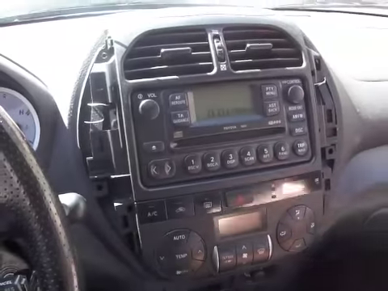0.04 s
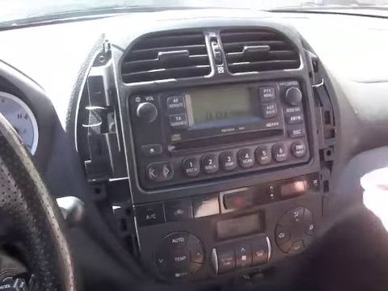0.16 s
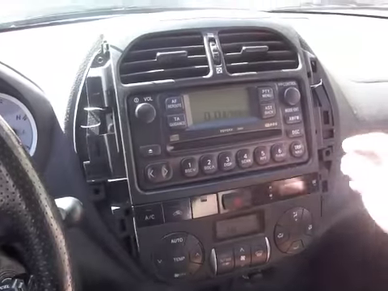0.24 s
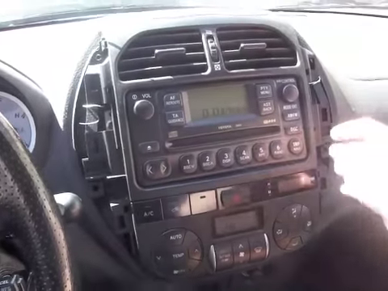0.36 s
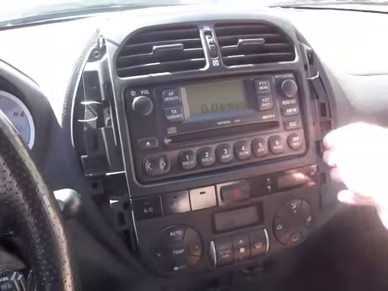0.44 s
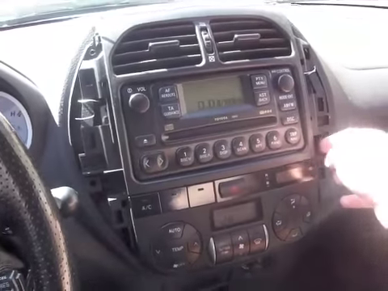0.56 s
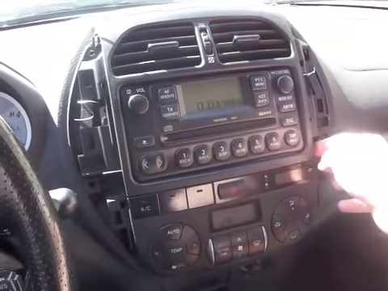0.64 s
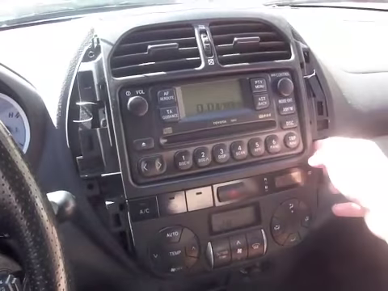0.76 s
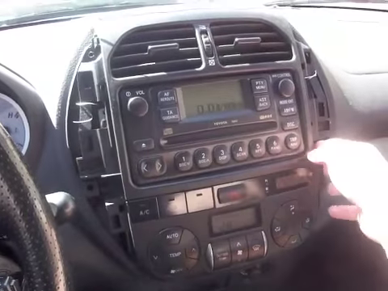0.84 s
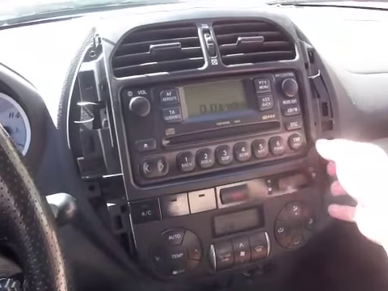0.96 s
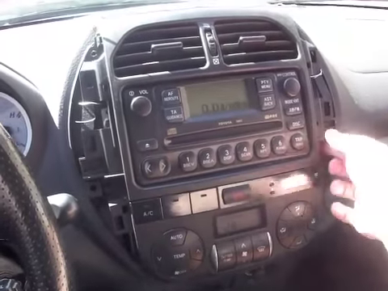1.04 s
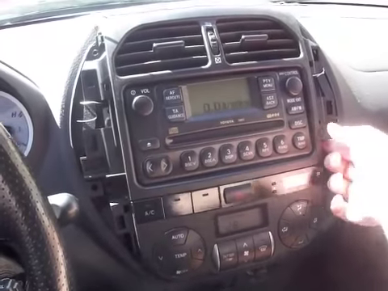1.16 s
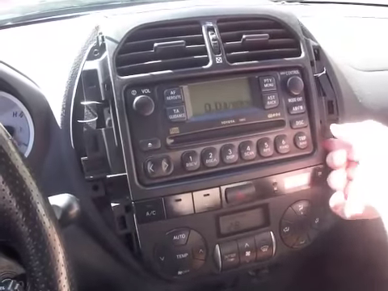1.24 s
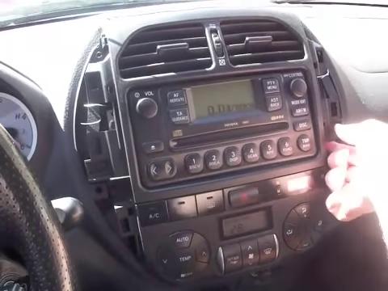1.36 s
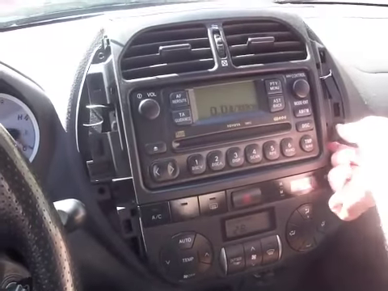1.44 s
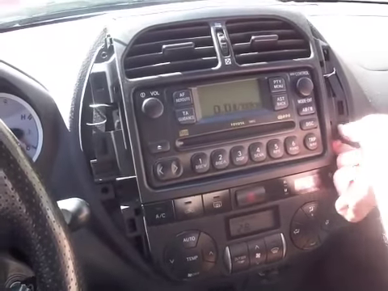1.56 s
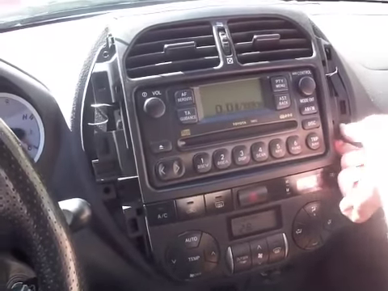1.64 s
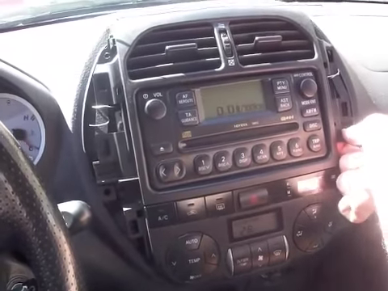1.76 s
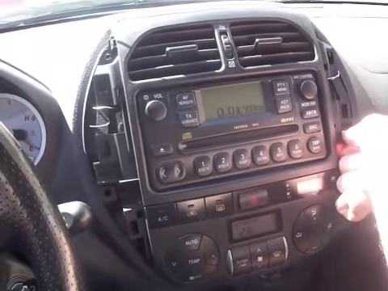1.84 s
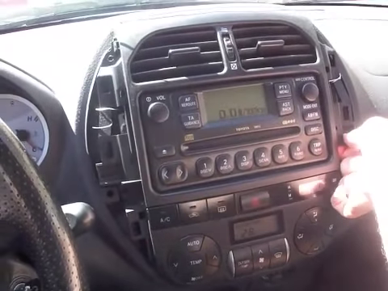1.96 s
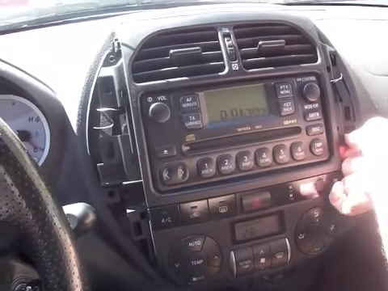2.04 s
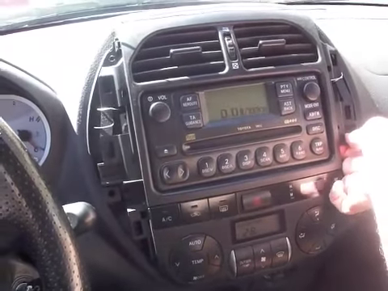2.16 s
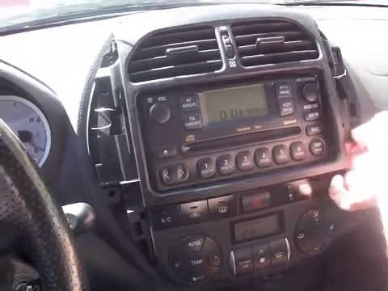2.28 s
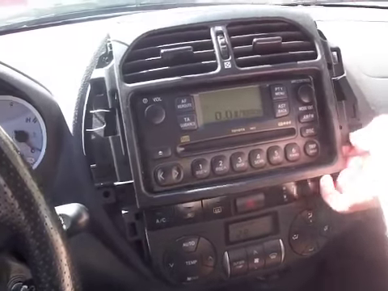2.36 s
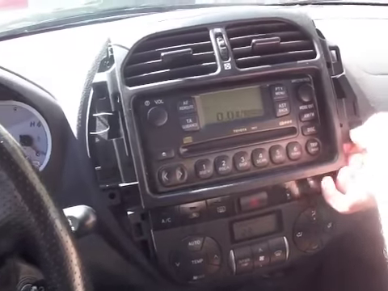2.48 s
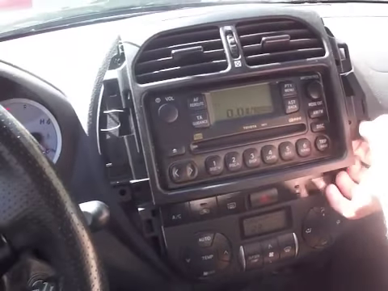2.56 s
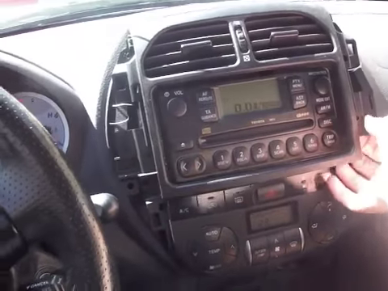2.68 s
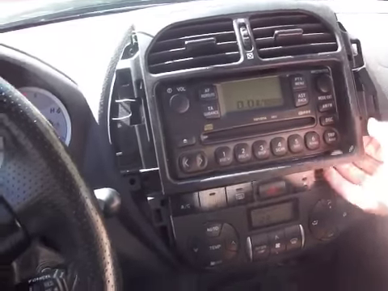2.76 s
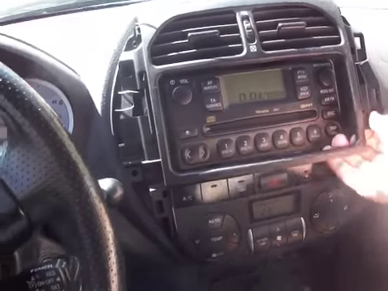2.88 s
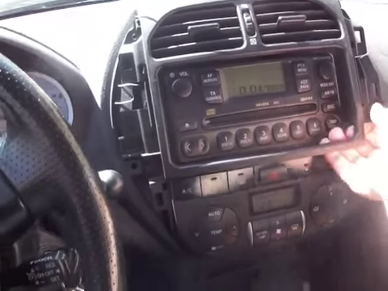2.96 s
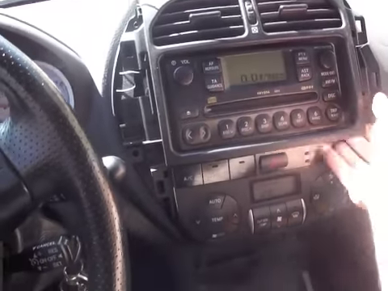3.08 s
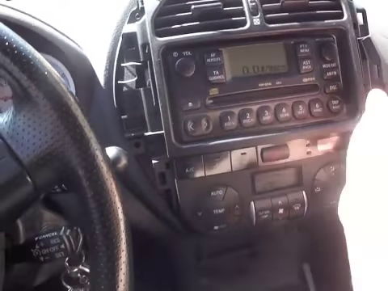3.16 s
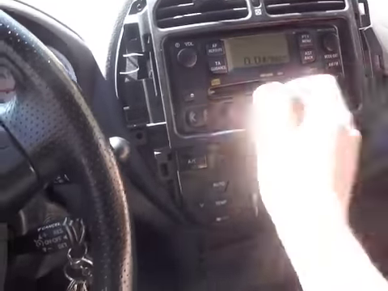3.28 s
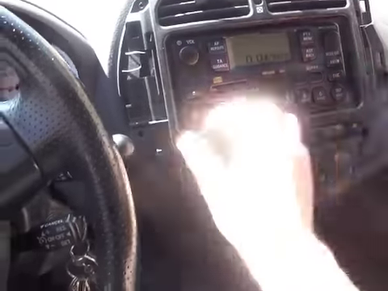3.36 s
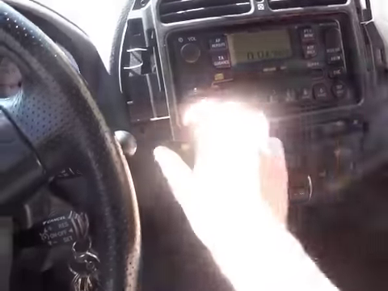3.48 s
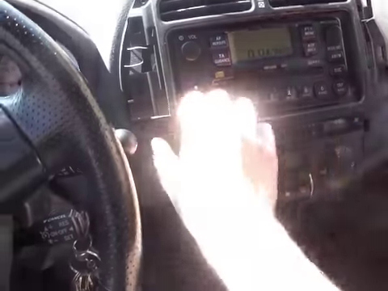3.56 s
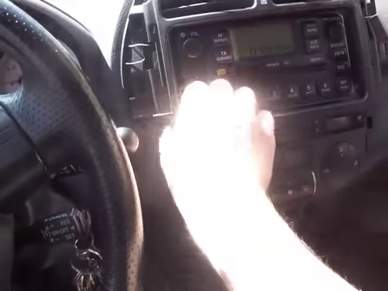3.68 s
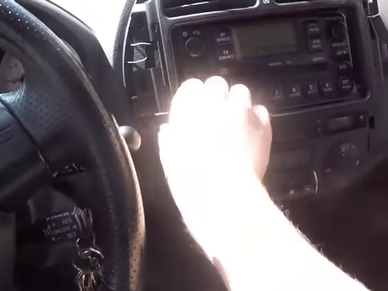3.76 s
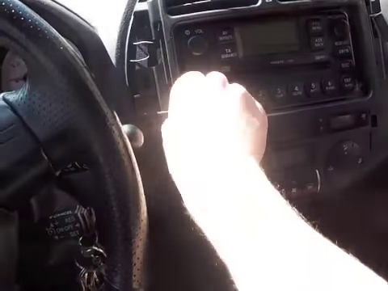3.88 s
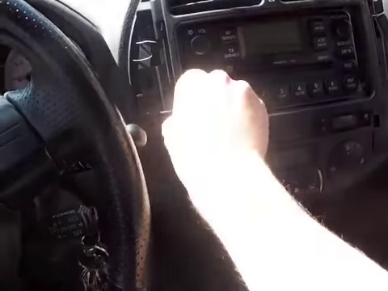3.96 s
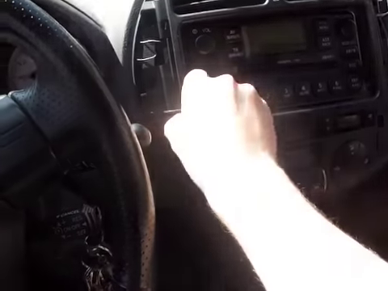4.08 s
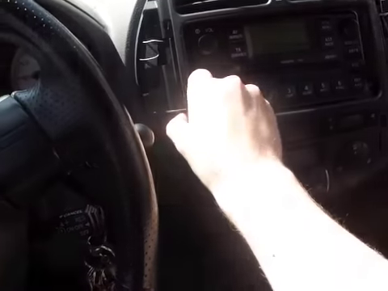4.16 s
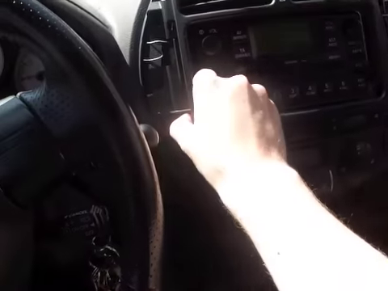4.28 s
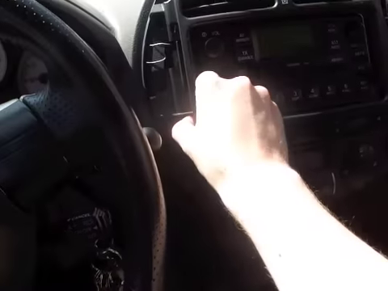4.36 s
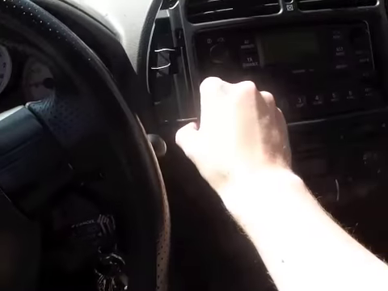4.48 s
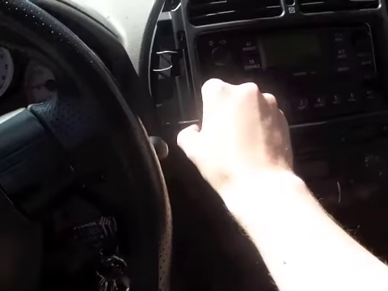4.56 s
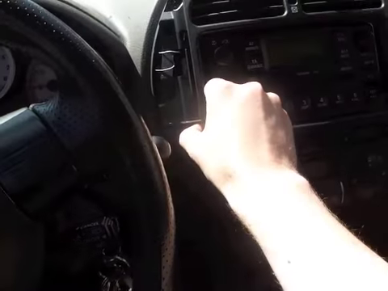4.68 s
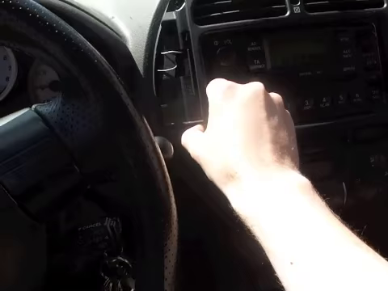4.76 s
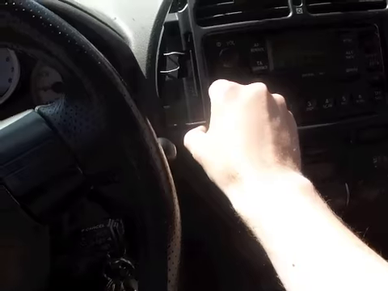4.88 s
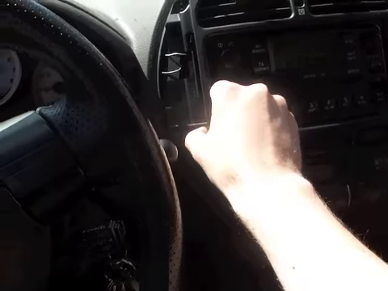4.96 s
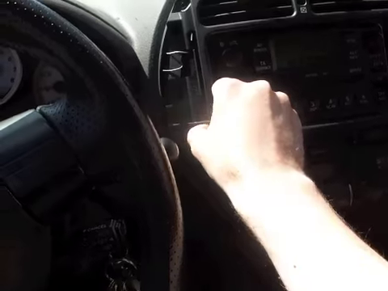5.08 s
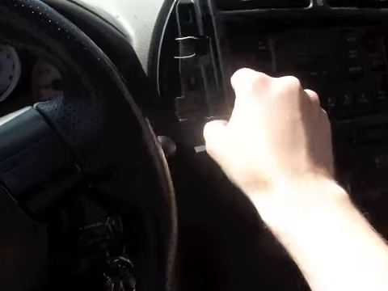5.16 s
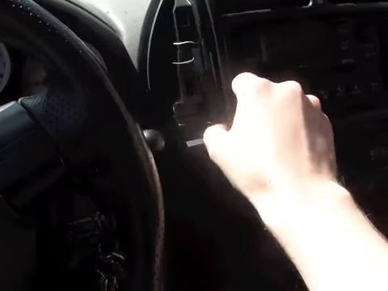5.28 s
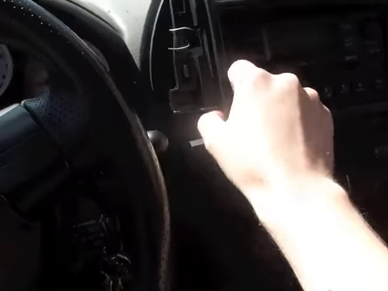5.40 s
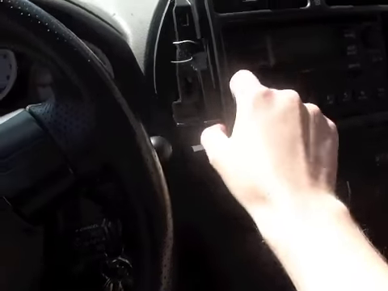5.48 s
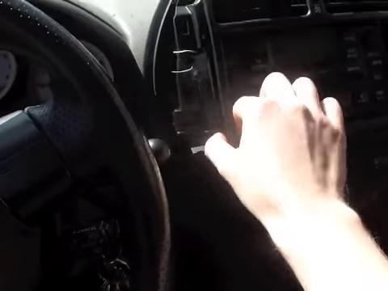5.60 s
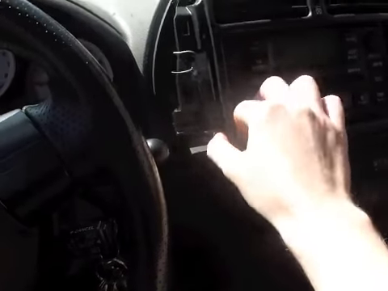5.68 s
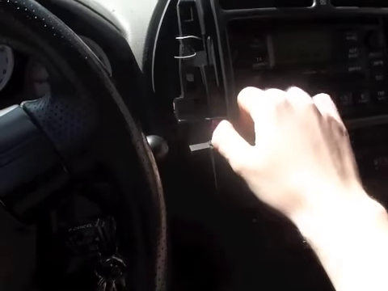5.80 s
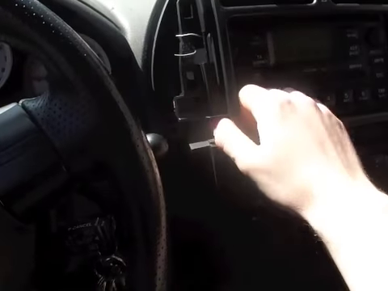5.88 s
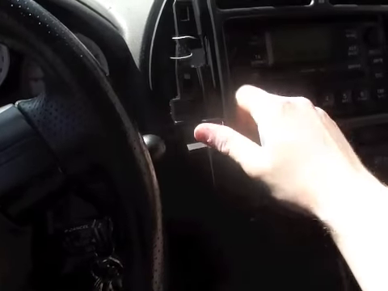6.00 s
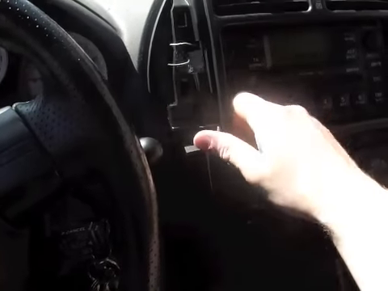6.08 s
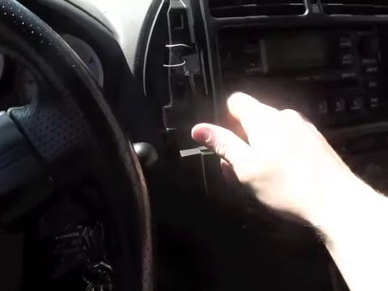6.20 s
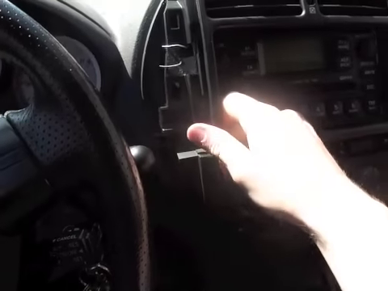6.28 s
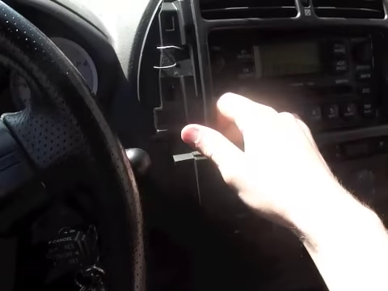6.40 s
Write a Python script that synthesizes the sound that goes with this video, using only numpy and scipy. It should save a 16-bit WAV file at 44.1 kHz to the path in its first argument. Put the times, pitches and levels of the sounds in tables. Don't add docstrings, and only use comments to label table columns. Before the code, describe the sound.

Close in a parked car, plastic clips click and knock under pulling fingers, tear free in two loud crackling bursts, and rattle afterward.

```python
import sys
import numpy as np
from scipy import signal
from scipy.fft import rfft, irfft, next_fast_len
from scipy.io import wavfile
from scipy.ndimage import uniform_filter1d

SR = 44100
rng = np.random.default_rng(int(sys.argv[2]) if len(sys.argv) > 2 else 0)


def wav_out(sig):
    wavfile.write(sys.argv[1], SR, np.round(np.clip(np.atleast_2d(sig).T, -1, 1) * 32767).astype(np.int16))


def voltage_ratio(decibels):
    exponent = np.asarray(decibels, float) / 20
    return 10 ** exponent


N = 284004

# frequency in Hz, level in dB.
FIZZ = [(3000, -14), (5000, -1.5), (7000, 0.5), (9000, 0), (12000, -0.5)]
# centre in Hz, width in Hz, depth in dB.
NOTCHES = [(3026, 290, -12.5), (3996, 303, -13), (5036, 320, -18)]


def evened(x):
    return x / np.sqrt(np.mean(x ** 2) + 1e-20)


def peaked(x, db):
    return voltage_ratio(db) * x / np.sqrt(uniform_filter1d(x.mean(0) ** 2, 130).max() + 1e-20)


def read(points, hz):
    f, value = np.transpose(points)
    return np.interp(np.log(hz + 1), np.log(f + 1), value)


def add(mix, s, sound, pan_db):
    part = mix[:, round(s * SR):][:, :sound.shape[-1]]
    sides = voltage_ratio(np.array([[pan_db / 2], [-pan_db / 2]]))
    part += (sound * sides)[:, :part.shape[1]]


def band(x, lo_hz, hi_hz, order=2):
    edges = [lo_hz, min(hi_hz, SR / 2 - 99)]
    return signal.sosfilt(signal.butter(order, edges, "band", fs=SR, output="sos"), x)


def resonate(x, hz, width):
    r = np.exp(-np.pi * width / SR)
    if np.ndim(hz) == 0:
        return 2 * signal.lfilter([1 - r], [1, -r * np.exp(2j * np.pi * hz / SR)], x).real
    turn = np.exp(2j * np.pi * np.cumsum(hz) / SR)
    return 2 * (turn * signal.lfilter([1 - r], [1, -r], x / turn)).real


def pair(noise, same):
    same = np.clip(same, -1, 1)
    return np.array([noise[0], same * noise[0] + np.sqrt(1 - same ** 2) * noise[1]])


def pressed_rub(t, hz):
    # time in s, level in dB.
    pressure = [
        (0.0, 10.5),
        (0.86, 2.5),
        (2.21, 5.5),
        (2.46, -6),
        (2.55, 10.5),
        (3.25, 2),
        (4.11, 1.5),
        (5.09, 1.5),
        (5.35, 4.5),
        (6.44, 3),
    ]
    # frequency in Hz, level in dB.
    air_colour = [(35, -14), (80, -25), (120, -9.5), (300, -0.5), (600, -3.5), (1200, -4), (2500, -13),
                  (4000, -17)]
    press_db = np.interp(t, *np.transpose(pressure))
    body = voltage_ratio(-50.5 + 0.32 * press_db - 2.5 + read(air_colour, hz)) * (hz < 5200)
    fizz = voltage_ratio(-63 + press_db - 12.0 + read(FIZZ, hz))
    return np.hypot(body, fizz)


def brushes(t, hz):
    # start in s, length in s, fizz in dB, body in dB.
    strokes = [(0.036, 0.65, -80, -81), (0.514, 0.092, -54.5, -58), (0.78, 0.038, -56, -81),
               (1.035, 0.1, -68, -52), (1.886, 0.043, -51, -87), (2.266, 0.15, -38, -34.5),
               (2.574, 0.11, -59, -47.5), (2.744, 0.19, -55.5, -47), (3.076, 0.094, -53.5, -56.5),
               (3.494, 0.069, -59, -54.5), (3.553, 0.09, -51.5, -52), (3.672, 0.078, -50.5, -54.5),
               (3.886, 0.036, -52, -56.5), (5.189, 0.049, -33.5, -31), (5.232, 0.092, -41.5, -38),
               (5.331, 0.062, -58, -45), (5.383, 0.15, -53, -51), (5.492, 0.047, -45, -68),
               (5.596, 0.095, -47, -77), (5.803, 0.097, -61, -55.5), (5.944, 0.052, -49, -56),
               (6.199, 0.021, -43.5, -69), (6.293, 0.08, -61, -65)]
    # frequency in Hz, level in dB.
    skin_colour = [(80, -16), (220, -1), (400, -4), (1000, -1), (2300, -6.5), (3300, -9), (5000, -14.5)]
    start, length, fizz_db, body_db = np.transpose(strokes)[:, :, None]
    swell = np.sin(np.pi * np.clip((t - start) / length, 0, 1)).clip(0)
    body = np.sqrt((swell * voltage_ratio(2 * body_db)).sum(0)) * voltage_ratio(read(skin_colour, hz) - 4.5)
    fizz = np.sqrt((swell * voltage_ratio(2 * fizz_db)).sum(0)) * voltage_ratio(read(FIZZ, hz) - 13.5) * (hz > 4300)
    return np.hypot(body, fizz)


def rub():
    # frequency in Hz, coherence as a ratio.
    likeness = [(60, 0.62), (220, -0.42), (840, -0.26), (3140, 0.0023), (11700, -0.026)]
    frames, hz = N // 128 + 5, np.fft.rfftfreq(512, 1 / SR)
    draws = rng.standard_normal((frames, 257, 9)).T
    air, skin = (draws[:4] + 1j * draws[4:8]).reshape(2, 2, 257, frames)
    patches = evened(uniform_filter1d(uniform_filter1d(draws[8], 6, 0), 16, 1))
    flicker = evened(uniform_filter1d(rng.standard_normal(frames), 4))
    hz, t = hz[:, None], np.arange(frames) * 128 / SR
    z = pair(air, read(likeness, hz)) * pressed_rub(t, hz) * voltage_ratio(0.63 * flicker)
    z += pair(skin, np.exp(-hz / 9000)) * brushes(t, hz) * voltage_ratio(2.0 * flicker)
    sound = signal.istft(z * voltage_ratio(0.75 * patches), nperseg=512, noverlap=384)[1]
    return sound[:, :N] * voltage_ratio([[-.4], [.4]])


def slips():
    # start in s, tick peak in dB, knock peak in dB, panel in Hz.
    touches = [(0.0014, -55, -28.5, 875), (0.0269, -23.5, -25.5, 1700), (0.5342, -61, -38, 870),
               (0.6194, -49, -45, 880), (1.2135, -58, -37.5, 1570), (1.2203, -44, -38.5, 1650),
               (1.279, -48, -41.5, 607), (1.3526, -63, -41.5, 1340), (3.1035, -53, -41, 690),
               (3.5024, -45, -43.5, 920), (3.7224, -59, -46, 905), (3.932, -41, -54, 1030)]
    # start in s, tick in dB, knock in dB, panel in Hz.
    taps = [
        (0.935, -34, -60, 899),
        (0.954, -36.5, -60, 900),
        (1.1755, -34.5, -34, 1620),
        (3.1383, -40, -39, 920),
        (3.51, -55, -37, 910),
        (6.109, -31, -32, 1640),
    ]
    # start in s, tick in dB, knock in dB, panel in Hz.
    pulled = [(1.5966, -38.5, -33.5, 1670), (1.6706, -25, -34, 1870), (1.7435, -22.5, -39, 1620),
              (1.7858, -15.5, -29, 2060), (1.9647, -22.5, -31, 940), (2.0203, -20.5, -33, 1940),
              (2.0351, -32, -40, 1120), (2.1038, -19, -25, 2230), (2.146, -27, -34.5, 1090),
              (4.0119, -20, -31.5, 1620), (4.0277, -17.5, -28, 1190), (4.0673, -16, -29.5, 1530),
              (4.139, -22, -31, 1100), (4.183, -18.5, -39, 2220), (4.1889, -17.5, -27, 2090),
              (4.252, -63, -32, 1560), (4.3125, -17.5, -30, 2500), (4.35, -10.5, -26.5, 1130),
              (4.4116, -19, -31.5, 2220), (4.4448, -35, -58, 996), (4.4745, -23.5, -35, 2220),
              (4.566, -26, -36.5, 2020), (4.6888, -12.5, -24, 1390), (4.785, -18, -30, 2190),
              (4.9113, -19, -27.5, 1220), (5.0396, -21, -32, 1090), (5.888, -23.5, -31.5, 2320),
              (6.0542, -27.5, -29, 1160), (6.4183, -19.5, -30.5, 1220)]
    # start in s, tick in dB, knock in dB, panel in Hz, t60 in s.
    snaps = [(2.2442, -29.5, -37.5, 1190, 0.12), (2.273, -23.5, -28.5, 2500, 0.011),
             (2.2889, -7, -12, 1110, 0.06), (2.294, -14, -11.5, 920, 0.019), (2.3378, -28, -32, 1400, 0.03),
             (2.3419, -8, -24.5, 1010, 0.076), (2.351, -7, -27, 1730, 0.035),
             (2.3674, -18, -20.5, 1330, 0.19), (2.394, -4, -14.5, 1860, 0.042),
             (2.4086, -8.5, -14.5, 2340, 0.053), (2.422, -11, -18.5, 1480, 0.056),
             (5.1418, -44, -35, 760, 0.082), (5.149, -8.5, -7, 874, 0.027), (5.153, -24, -15, 780, 0.023),
             (5.1641, -8, -22.5, 1470, 0.094), (5.1735, -8.5, -10.5, 1010, 0.047),
             (5.194, -20, -19.5, 1470, 0.12), (5.2098, -20, -35, 1420, 0.075),
             (5.2362, -8, -22, 740, 0.044), (5.2492, -33, -18, 1500, 0.041), (5.255, -12, -17, 830, 0.045),
             (5.3038, -31, -26, 1180, 0.027), (5.341, -41, -43, 2060, 0.033),
             (5.3554, -17, -30.5, 2020, 0.049), (5.372, -27, -27.5, 1470, 0.085)]
    # start in s, tick in dB, knock in dB, panel in Hz.
    rattle_side = [(2.2584, -31, -41, 1640), (2.4572, -38, -28.5, 1400), (2.4672, -24.5, -33, 1590),
                   (2.4764, -28, -41, 1210), (2.5262, -25, -33.5, 1240), (2.5447, -29, -36, 2070),
                   (2.574, -19.5, -29.5, 1640), (2.5883, -21.5, -39, 1220), (2.6122, -28, -32, 1540),
                   (2.6394, -55, -37, 2130), (2.7324, -57, -39, 1410), (2.7541, -25, -42, 1580),
                   (2.794, -35, -31.5, 1180), (2.802, -43, -27, 890), (2.812, -17, -28.5, 1400),
                   (2.8424, -51, -40, 1030), (2.899, -39, -37.5, 1070), (2.9262, -37.5, -39, 1560),
                   (2.952, -50, -40, 1170), (2.9694, -55, -37, 1560)]
    # start in s, tick in dB, knock in dB, panel in Hz.
    rattle_low = [(5.285, -29, -50, 1500), (5.473, -29.5, -32.5, 1450), (5.6012, -28.5, -36.5, 2320),
                  (5.629, -45, -37.5, 1050), (5.665, -31, -37.5, 2390), (5.8285, -41, -34.5, 1460),
                  (5.8475, -53, -35, 1540), (5.8617, -58, -35.5, 1370), (5.9804, -38.5, -35, 1130),
                  (6.0448, -45, -35.5, 1220), (6.1474, -46, -42.5, 2020), (6.2014, -38, -49, 1800),
                  (6.3193, -40.5, -47.5, 2000), (6.3687, -36.5, -37, 2380)]
    rows = [(*row, -2.5) for row in snaps] + [(*row, .009, 1.5) for row in taps]
    groups = [(touches, -2, 0.055, 0.062), (pulled, -2, 0.042, 0.04),
              (rattle_side, -2, 0.055, 0.062), (rattle_low, -3.5, 0.055, 0.062)]
    for table, pan_db, ring_s, longest_s in groups:
        for s, tick_db, knock_db, hz in table:
            t60 = min(ring_s * voltage_ratio(0.13 * (knock_db - tick_db)), longest_s)
            rows.append((s, tick_db, knock_db, hz, t60, pan_db))
    return rows


def ticks(slip_rows):
    creep_s = .003
    out, t = np.zeros((2, N)), np.arange(3000) / SR
    free = np.maximum(t - creep_s, 0)
    onset = 1 - np.exp(-free / 0.00069) + voltage_ratio(-21) * np.minimum(t / creep_s, 1)
    strike = 1.9 * np.exp(-((t - creep_s - .0003) / .00003) ** 2)
    chance = rng.standard_normal((len(slip_rows), 3, len(t)))
    for (s, db, _, _, t60, pan_db), (a, b, grain) in zip(slip_rows, chance):
        fall = voltage_ratio(-60 * free / .014) + .45 * voltage_ratio(-60 * free / np.clip(1.28 * t60, .008, .2))
        uneven = voltage_ratio(2.6 * uniform_filter1d(grain, 24) * np.sqrt(24))
        spray = (pair([a, b], 0.4) + strike) * uneven * fall * onset
        tongue_hz = 8100 + 700 * np.clip(grain[0], -2, 2)
        ring = evened(band(spray, 1920, 17000)) + 0.57 * evened(resonate(spray, tongue_hz, 1170))
        add(out, max(s - creep_s, 0), peaked(ring, db - 2.5), 2.43 * pan_db + 0.5)
    return out


def knocks(slip_rows):
    # frequency in Hz, gain in dB, t60 in s.
    panel = [(920, 10.5, 0.13), (1030, 6, 0.057), (1220, 13, 0.022), (1470, 11, 0.028), (1620, 10, 0.075),
             (1800, -4, 0.021), (2020, 9, 0.02), (2220, -27, 0.04), (2340, -27, 0.038), (3350, 13, 0.026),
             (760, -40, 0.06)]
    out, t = np.zeros((2, N)), np.arange(5000) / SR
    contact = 16 * np.exp(-t / .00016)
    chance = rng.standard_normal((len(slip_rows), 3, len(t)))
    for (s, _, db, hz, t60, pan_db), (a, b, spot) in zip(slip_rows, chance):
        fall = voltage_ratio(-60 * t / np.clip(1.3 * t60, .008, .2)) * (1 - np.exp(-t / 0.00073))
        blow = (pair([a, b], 0.84) + contact) * fall
        modes = sum(voltage_ratio(gain + 0.59 * u) * resonate(blow, f, 1.9 / ring)
                    for (f, gain, ring), u in zip(panel, spot))
        body = 0.43 * evened(band(blow, 1140, 2930)) + 0.88 * evened(resonate(blow, hz, 165))
        body = body + 0.5 * evened(modes)
        add(out, s, peaked(body, db + 1.92), 0.29 * pan_db + 0.59)
    return out


def dispersed(x):
    size = next_fast_len(N + 2000)
    hz = np.fft.rfftfreq(size, 1 / SR)
    late_s = 0.003991 * np.clip(np.sqrt(2607 / (hz + 1)) - 1, 0, 2)
    phase = 2 * np.pi * np.cumsum(late_s) * hz[1]
    return irfft(rfft(x, size) * np.exp(-1j * phase), size)[:, :N]


def jolts(rows, t60, lift_db, rise, sharpness):
    out, t = np.zeros((2, N)), np.arange(6000) / SR
    fall = voltage_ratio(-60 * t / np.clip(t60, .01, .3)) * (1 - np.exp(-t / rise))
    for (s, db, hz), shake in zip(rows, rng.standard_normal((len(rows), len(t)))):
        push = shake * fall
        ring = evened(band(push, 0.44 * hz, 1.47 * hz, order=3))
        ring = ring + 1.02 * evened(resonate(push, hz, hz / sharpness))
        add(out, s, peaked(ring[None], db + lift_db), .3)
    return out


def thumps():
    # start in s, peak in dB, frequency in Hz.
    events = [(0.009, -34, 454), (0.534, -44, 382), (1.597, -38.5, 510), (1.968, -41, 495),
              (2.109, -38.5, 292), (2.288, -15.5, 228), (2.2895, -20.5, 580), (2.344, -24, 427),
              (2.399, -35, 395), (2.429, -36, 455), (2.799, -33.5, 490), (2.899, -39, 437),
              (4.028, -36, 400), (4.072, -36, 394), (4.142, -44, 410), (4.353, -42, 256), (4.419, -40, 296),
              (4.692, -37, 400), (4.793, -40, 280), (4.915, -37, 407), (5.15, -15.5, 270),
              (5.177, -26, 227), (5.249, -30, 157), (5.368, -42, 400), (5.82, -43.5, 410),
              (2.303, -22.5, 300), (2.314, -28, 400), (2.37, -32, 390), (2.447, -37, 373),
              (5.217, -33.5, 330), (5.272, -33, 332)]
    return jolts(events, t60=0.081, lift_db=0.12, rise=0.0015, sharpness=7.0)


def squeaks():
    # start in s, length in s, top in dB, first Hz, last Hz.
    whistles = [
        (0.59, 0.3, -54, 4600, 4830),
        (0.656, 0.083, -53, 5400, 5400),
        (0.73, 0.058, -57, 5650, 5750),
        (0.801, 0.028, -42, 5530, 5550),
        (0.826, 0.028, -44, 5470, 5540),
        (0.845, 0.099, -56, 5570, 5400),
        (1.241, 0.34, -54, 4730, 4870),
        (1.513, 0.41, -48.5, 5430, 5850),
        (1.969, 0.27, -43, 5500, 5840),
    ]
    # start in s, length in s, top in dB, first Hz, last Hz.
    creaks = [
        (1.345, 0.31, -47.5, 2090, 1830),
        (5.969, 0.32, -47.5, 2046, 1800),
    ]
    out = np.zeros((2, N))
    for table, width_hz in [(whistles, 400), (creaks, 120)]:
        for s, length, db, from_hz, to_hz in table:
            u = np.arange(0, length, 1 / SR) / length
            a, b, flutter = rng.standard_normal((3, len(u)))
            hz = from_hz + (to_hz - from_hz) * u
            tone = evened(resonate(resonate(pair([a, b], 0.13), hz, width_hz), hz, width_hz))
            stick_db = 3.0 * evened(uniform_filter1d(flutter, 700))
            add(out, s, tone * voltage_ratio(db + stick_db) * np.sin(np.pi * u), 0)
    return out


def pings():
    # start in s, peak in dB, frequency in Hz.
    events = [(1.1762, -44, 3350), (1.5973, -52, 3460), (1.6712, -58, 3320), (1.9662, -54, 3700),
              (4.351, -40, 4650), (4.6892, -36.5, 4500), (4.788, -59, 4260), (2.2895, -41, 3700),
              (2.3955, -27, 4650), (1.7862, -44, 4300), (2.0206, -63, 3480), (2.1042, -65, 4400),
              (3.107, -57, 3530), (5.602, -56, 3500), (5.83, -60, 3450), (6.054, -55, 3500),
              (6.371, -58, 3500), (6.419, -59, 3600), (2.814, -49, 3500)]
    return jolts(events, t60=0.025, lift_db=14.6, rise=0.0009, sharpness=28.0)


def rings():
    # start in s, peak in dB, frequency in Hz, t60 in s.
    struck = [(5.1495, -7.5, 785, 0.035), (5.154, -13.5, 1490, 0.055), (5.171, -24, 2120, .05),
              (5.174, -17.5, 1030, 0.07), (5.196, -28, 1480, .07), (5.208, -28, 1180, .05),
              (5.253, -17, 1487, 0.076), (5.255, -15, 2010, .06), (2.292, -17, 1950, 0.059),
              (2.367, -19, 1470, .04), (2.3945, -17, 1990, 0.037), (2.408, -19, 2333, .04),
              (2.41, -17, 1417, 0.11), (2.436, -29, 1408, .05), (1.597, -38, 2180, 0.052),
              (1.673, -39, 1890, 0.045), (1.786, -31.5, 2100, 0.03), (1.788, -24.5, 2700, 0.028),
              (1.787, -27.5, 1620, 0.053), (2.745, -33, 1330, .04), (2.799, -24.5, 1087, .04),
              (2.814, -31, 2260, 0.023), (2.9, -40, 2230, 0.032), (2.969, -41, 2070, 0.029),
              (3.104, -45, 2170, 0.072), (3.109, -40, 873, 0.077), (3.139, -36.5, 2090, 0.021),
              (3.14, -38, 890, .04), (3.724, -36, 885, 0.043), (4.184, -33, 2390, 0.026),
              (4.191, -25.5, 2117, .03), (4.254, -33, 1510, 0.02), (4.313, -38, 2410, 0.023),
              (4.352, -30, 1120, 0.071), (4.69, -36, 2310, 0.039), (4.69, -30, 1388, 0.045),
              (4.786, -27.5, 2277, 0.023), (4.91, -40, 1220, 0.045), (4.013, -33, 2230, .03),
              (4.068, -35, 2410, 0.022), (4.412, -30, 2360, 0.026), (4.475, -35, 2390, 0.021),
              (4.569, -39, 1500, 0.036), (5.83, -40, 2040, .05), (5.833, -38, 650, 0.06),
              (5.978, -39, 2090, .06), (6.053, -32.5, 2360, 0.042), (6.42, -35, 1950, 0.05),
              (2.527, -36, 2080, .03), (2.575, -34, 1160, .05)]
    out, t = np.zeros((2, N)), np.arange(4000) / SR
    for (s, db, hz, t60), turn in zip(struck, rng.random(len(struck))):
        fall = voltage_ratio(-60 * t / np.clip(t60, .01, .2)) * (1 - np.exp(-t / 0.00076))
        tone = np.sin(2 * np.pi * (hz * t + turn)) * fall
        add(out, s, peaked(tone[None], db - 3.0), -1.5)
    return out


def twangs():
    # start in s, peak in dB, frequency in Hz.
    events = [
        (2.3514, -10, 8800),
        (2.3962, -15, 7500),
        (5.1505, -7, 9900),
        (5.1742, -6, 9800),
        (5.1768, -14, 6100),
        (5.2368, -8, 9500),
    ]
    return jolts(events, t60=0.029, lift_db=0.42, rise=0.00029, sharpness=12.0)


def cabin(x):
    # frequency in Hz, t60 in s.
    decay = [(200, 0.43), (700, 0.057), (2000, 0.078), (8000, 0.049)]
    taps = np.zeros((2, 9000))
    at = np.arange(100, 8980, 20) + rng.integers(0, 20, (2, 444))
    np.put_along_axis(taps, at, rng.choice([-1., 1.], at.shape), 1)
    hz, t, z = signal.stft(taps, SR, nperseg=128)
    z = pair(z, np.exp(-hz / 5500)[:, None])
    z = z * voltage_ratio(-60 * t / read(decay, hz)[:, None])
    tail = signal.istft(z, SR, nperseg=128)[1]
    return signal.fftconvolve(x.mean(0)[None], tail / np.linalg.norm(tail[0]), axes=1)[:, :N]


def scene():
    rows = slips()
    hits = ticks(rows) + dispersed(knocks(rows)) + thumps() + pings() + rings() + twangs()
    return hits + voltage_ratio(-14) * cabin(hits) + rub() + squeaks()


def housed(dry):
    # frequency in Hz, gain in dB.
    response = [(30, -15), (100, -9), (170, -5), (700, -2.5), (2350, -2.5), (2800, -16), (3500, -15),
                (4600, -18), (5300, -9.5), (6000, -5.5), (10200, -8), (11400, -18.5), (12000, -46),
                (13000, -34.5), (15500, -56)]
    hz = abs(np.fft.fftfreq(8192, 1 / SR))
    db = read(response, hz) + sum(g / (1 + ((hz - f) / w * 2) ** 2) ** 2 for f, w, g in NOTCHES)
    log_gain = np.log(voltage_ratio(np.maximum(db, -100)))
    taps = np.fft.ifft(np.exp(log_gain - 1j * signal.hilbert(log_gain).imag)).real[:4096]
    return signal.oaconvolve(dry, taps[None], axes=1)[:, :N]


def gated(x):
    quiet_db, relative_db, busy_db, top_hz = -94.5, -24, -52, 12100
    hz, _, z = signal.stft(x, SR, nperseg=1024)
    hz = hz[:512, None]
    power = (abs(z[:, :512]) ** 2).mean(0, keepdims=True)
    bands = power.reshape(1, 256, 2, -1).mean(2).repeat(2, 1)
    bands = uniform_filter1d(bands, size=3, axis=2)
    loud = uniform_filter1d(power[:, :256].mean(1, keepdims=True), size=3, axis=2)
    thrift_db = 1.1 * evened(uniform_filter1d(rng.standard_normal(z.shape[2]), size=4))
    thrift_db = thrift_db + sum(13 * (abs(hz - f) < 75) for f, _, _ in NOTCHES)
    valley_db = np.where(hz < 5300, 0, -14)
    faint_floor = voltage_ratio(2 * (quiet_db + thrift_db))
    relative_floor = voltage_ratio(2 * (relative_db + valley_db)) * loud * (hz < top_hz)
    keep = np.ones(z.shape)
    keep[:, :512] = (bands > np.maximum(faint_floor, relative_floor)) | (hz < 2500)
    keep[:, :512] *= (hz < top_hz) | (loud < voltage_ratio(2 * busy_db))
    return signal.istft(z * keep, SR, nperseg=1024)[1][:, :N]


def low_pass(x):
    return signal.sosfilt(signal.butter(12, 15800, fs=SR, output="sos"), x)


def record(dry):
    mix = gated(0.82 * np.tanh(housed(dry) / 0.95))
    return low_pass(mix)


dry = scene()
out = record(dry)
wav_out(out)
```